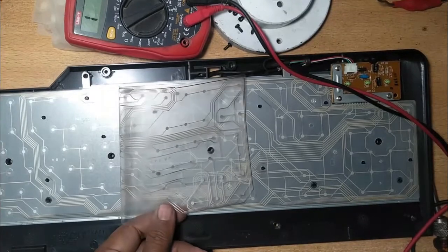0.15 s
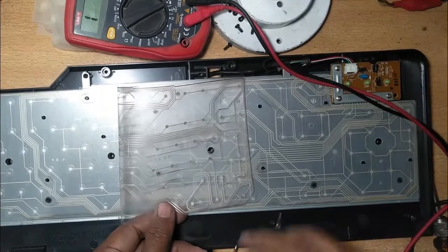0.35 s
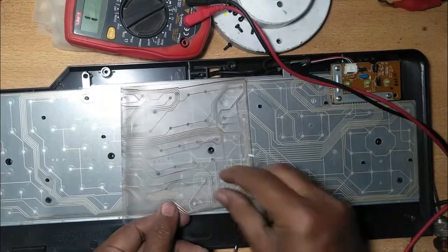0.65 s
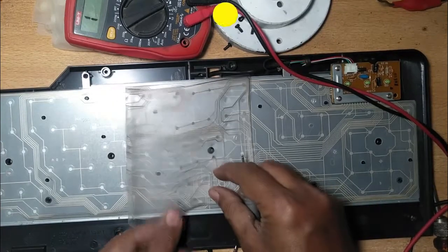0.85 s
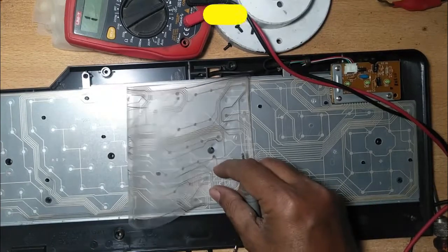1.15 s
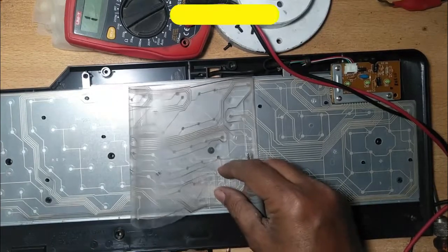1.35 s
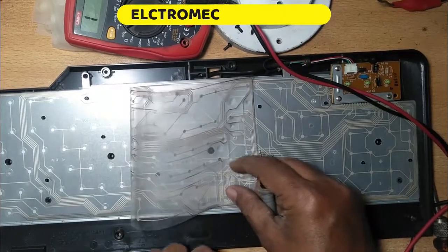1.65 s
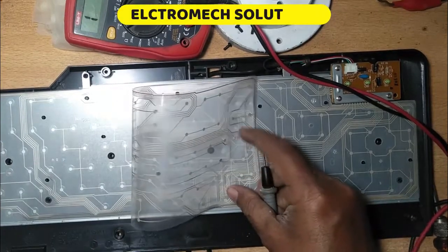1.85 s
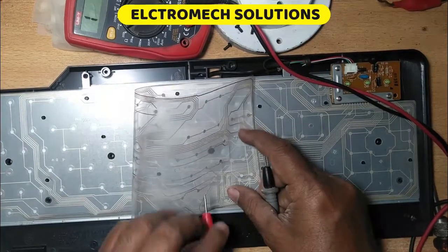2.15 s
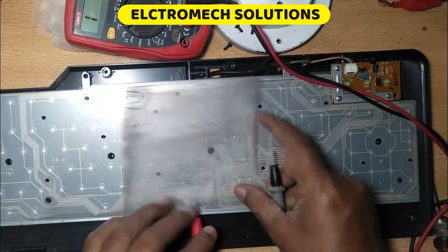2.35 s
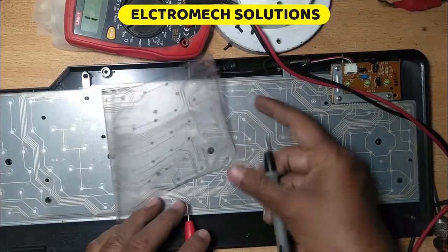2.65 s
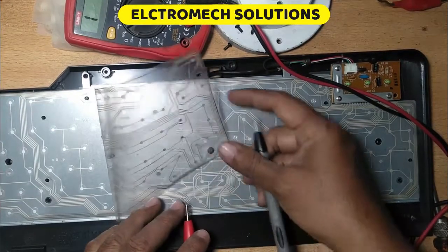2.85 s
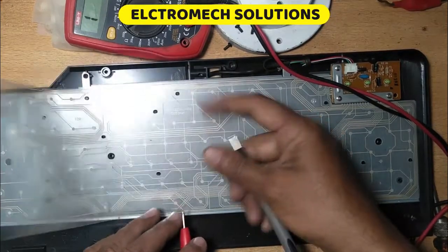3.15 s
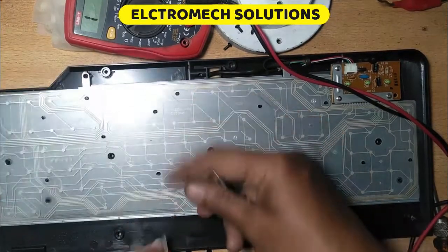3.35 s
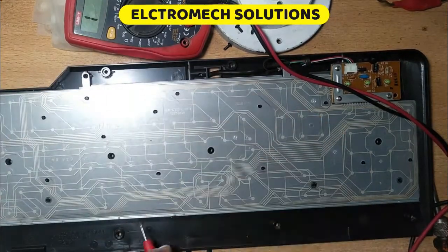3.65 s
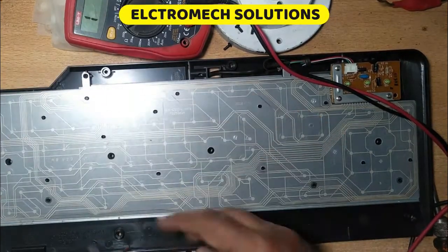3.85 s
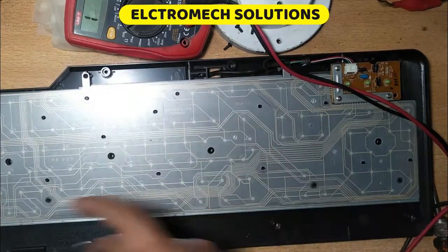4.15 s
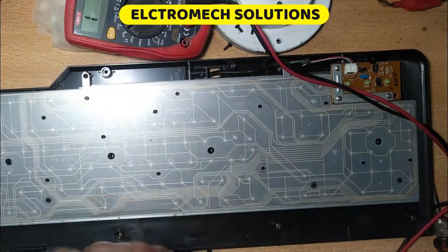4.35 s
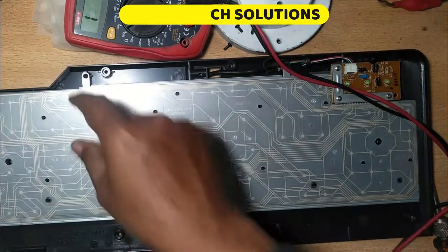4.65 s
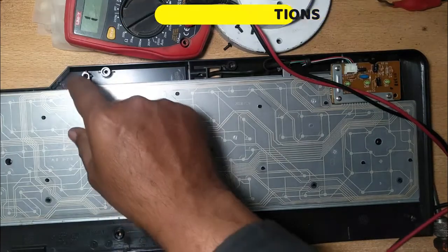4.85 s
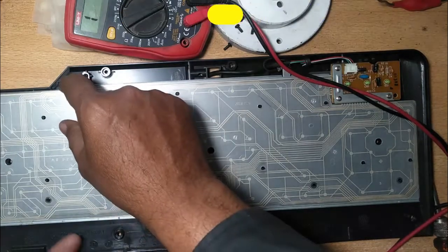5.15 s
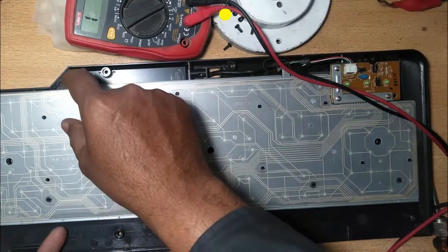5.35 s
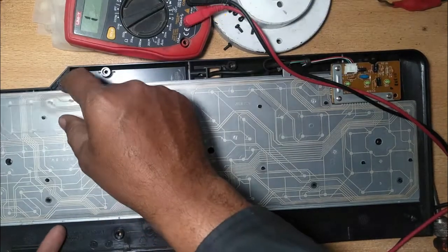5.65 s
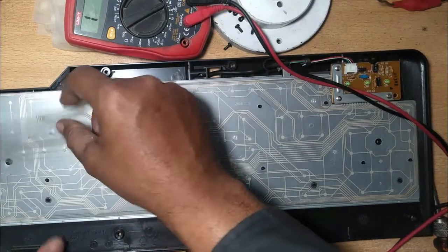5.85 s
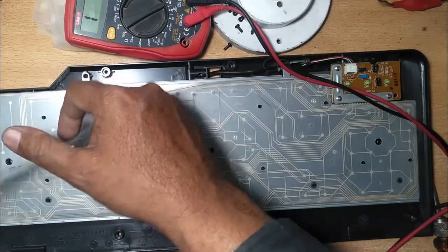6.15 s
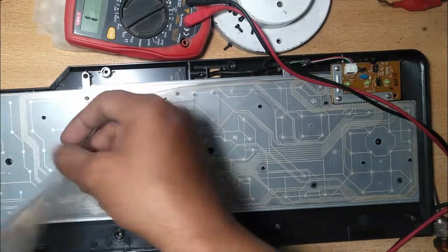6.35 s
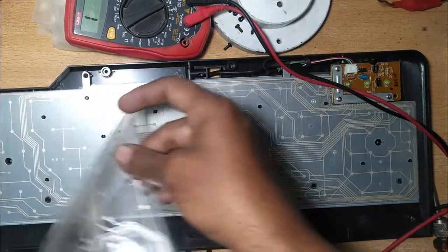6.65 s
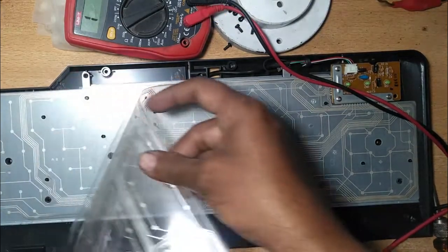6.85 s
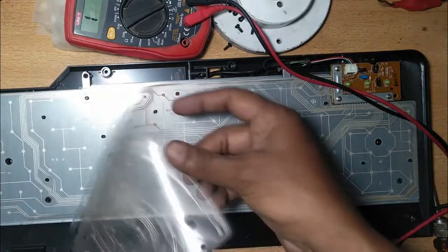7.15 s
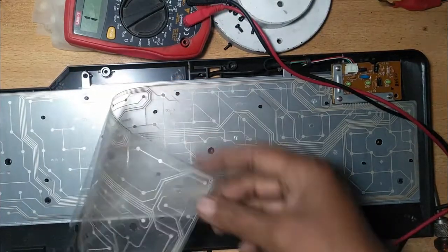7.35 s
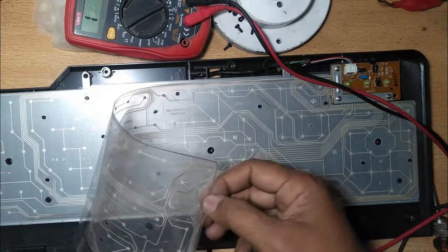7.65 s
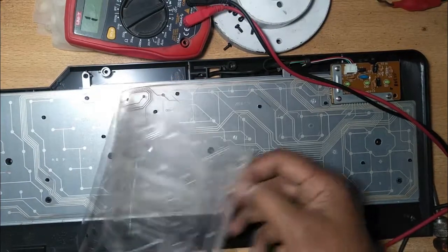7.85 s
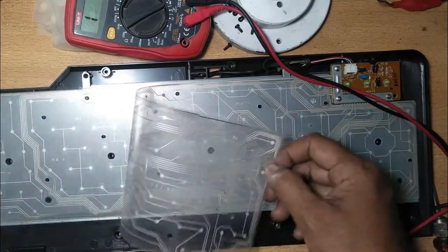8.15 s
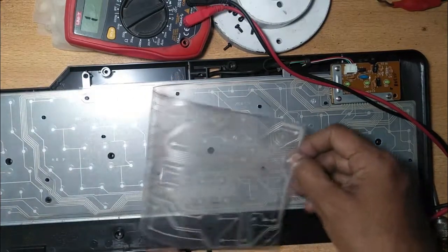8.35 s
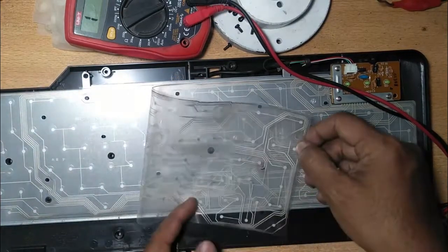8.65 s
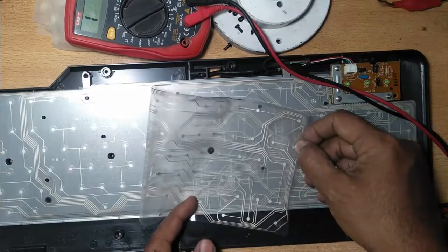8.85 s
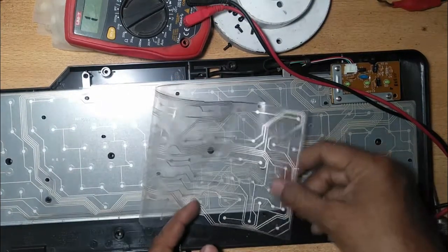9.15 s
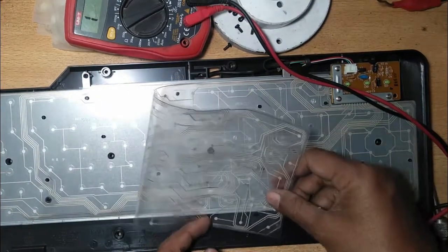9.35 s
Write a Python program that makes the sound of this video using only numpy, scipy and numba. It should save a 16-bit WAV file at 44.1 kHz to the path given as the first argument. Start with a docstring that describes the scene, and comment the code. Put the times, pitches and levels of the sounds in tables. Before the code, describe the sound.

A thin plastic sheet is lifted and flexed with irregular rustles and clicks, after a sharp double knock on a wooden bench.

```python
"""On a wooden bench in a small room, a thin plastic sheet is rubbed, lifted, flexed and laid on a tray.
Sliding, creaking, crunching and sharp buckling snaps make the sheet ring; when loose, it flaps and warbles.
Knocks ring the bench, and handling makes it rumble. A phone close by picks this up,
along with the room's short echo and a soft hiss."""
import sys
import numpy as np
from scipy import signal
from scipy.fft import rfft, irfft
from scipy.io import wavfile
from scipy.ndimage import uniform_filter1d
from numba import njit

SR = 44100
rng = np.random.default_rng(int(sys.argv[2]) if len(sys.argv) > 2 else 0)


def wrap_up_sound(samples):
    """Save the sound to the file named by the first command line argument, as 16-bit audio."""
    columns = np.atleast_2d(samples).T
    # keep every value between -1 and 1, then stretch to whole-number steps
    tamed = np.clip(columns, -1, 1)
    steps = np.round(tamed * 32767).astype(np.int16)
    wavfile.write(sys.argv[1], SR, steps)


N = 419391

# Table levels are relative. "Body" is the sheet's middle range; "centre" is the pitch that rings most.
# Slides of the sheet: t/s, rise/s, hold/s, treble level/dB, body level/dB, body centre f/Hz
SLIDES = [(0, 0.049, 0.13, -74.5, -72.5, 1680), (.27, 0.014, 0.098, -52, -51, 1600),
          (.45, 0.015, 0.17, -58, -61, 1740), (.75, 0.0032, 0.24, -59.5, -65.5, 1820),
          (1.15, 0.16, 0.051, -51, -55, 1660), (1.38, 0.085, 0.089, -50, -52.5, 2070),
          (1.62, 0.034, 0.14, -61.5, -53, 1600), (1.84, 0.048, 0.057, -64, -54, 1530),
          (2.22, 0.1, 0.15, -52.5, -59.5, 2440), (2.4, 0.055, 0.21, -55, -57, 1890),
          (2.66, 0.035, 0.28, -64, -58.5, 1690), (2.88, 0.041, 0.015, -51.5, -47.5, 1700),
          (3.25, 0.39, 0.047, -58, -72.5, 2370), (3.54, 0.035, 0.13, -97.5, -64, 1860),
          (4.01, 0.025, 0.23, -63, -59, 1950), (4.4, 0.22, 0.11, -63, -68.5, 2500),
          (4.53, 0.017, 0.059, -78.5, -58, 1840), (5.15, 0.007, 0.038, -67, -69.5, 2580),
          (5.345, .01, 0.021, -68.5, -69, 2700), (5.87, 0.11, 0.19, -57.5, -57.5, 2390),
          (6.3, 0.026, 0.13, -62, -67, 2240), (6.5, 0.066, 0.21, -52.5, -52.5, 1800),
          (6.69, 0.033, 0.059, -49, -47.5, 2270), (6.81, 0.04, 0.037, -49.5, -50, 1710),
          (6.92, 0.021, 0.096, -57, -55, 1710), (7.1, 0.038, 0.068, -48, -46.5, 1590),
          (7.25, 0.015, 0.19, -54, -63, 1710), (7.62, 0.049, 0.038, -68, -62, 1730),
          (7.82, 0.0067, 0.25, -67.5, -72.5, 1470), (8.3, 0.11, 0.1, -66, -71.5, 2590),
          (8.5, 0.01, 0.054, -54, -54, 2270), (8.62, 0.038, 0.088, -53.5, -57.5, 1680),
          (8.84, 0.14, 0.094, -54, -65.5, 1880), (9.08, 0.0056, 0.048, -46.5, -51, 1930),
          (9.17, 0.038, 0.14, -45, -50, 2140), (9.4, 0.011, 0.053, -53, -55, 2360)]
# Flapping of the loose end: t/s, rise/s, hold/s, level/dB, centre f/Hz
FLAPS = [(0, 0.13, 0.2, -65, 368), (.27, 0.014, 0.1, -42.5, 424), (1.25, 0.012, 0.35, -62.5, 554),
         (1.66, 0.013, 0.091, -46, 590), (2.62, 0.12, 0.56, -56, 376), (3.55, 0.027, 0.21, -67, 400),
         (4.02, 0.022, 0.19, -66, 653), (5.93, 0.05, 0.22, -62, 840), (6.34, 0.027, 0.046, -60, 840),
         (6.55, 0.027, 0.31, -55.5, 910), (6.75, 0.11, 0.41, -52.5, 577), (7.83, 0.018, 0.11, -64, 680),
         (8.52, 0.025, 0.014, -49, 880), (8.97, 0.011, 0.044, -57, 820)]
# Warbles of the loose sheet: t/s, length/s, f/Hz, level/dB
WARBLES = [(0, 0.41, 2003, -54), (0.754, 0.081, 637, -58), (0.812, 0.14, 194, -46.5),
           (1.02, 0.18, 853, -61.5), (1.087, 0.18, 1368, -59.5), (1.14, 0.47, 182.5, -51.5),
           (3.044, 0.42, 1954, -59.5), (3.22, 0.11, 191.3, -44), (3.1, .22, 1210, -64),
           (3.465, 0.14, 446.5, -43.5), (3.562, 0.093, 1690, -54.5), (3.66, 0.11, 399, -51),
           (3.869, 0.59, 1960, -59), (5.647, 0.071, 620, -59.5), (7.956, 0.022, 470, -46),
           (8.115, 0.089, 375, -52.5), (8.93, 0.033, 1040, -55.5)]
# Handling of the bench: t/s, rumble level/dB, thrum level/dB
HANDLING = [(.25, -70, -74), (.31, -55, -34), (.55, -65, -66.5), (1.1, -64, -66), (1.35, -59, -59),
            (2.2, -63.5, -78), (2.9, -62.5, -65.5), (4.3, -61, -68), (5.1, -64.5, -76), (5.8, -55, -62.5),
            (6.25, -61.5, -67.5), (6.8, -53, -57), (7.55, -65.5, -77.5), (7.68, -44, -48),
            (8.0, -56.5, -63), (8.6, -60, -68.5), (8.72, -50, -52.5), (9.0, -63.5, -76), (9.4, -55, -62)]
# Sharp snaps and soft crunches: t/s, treble level/dB, body level/dB, low level/dB, body centre f/Hz
SNAPS = [(0.2746, -10.5, -12, -17.5, 2500), (0.3494, -8, -13.5, -13, 2140), (0.384, -24, -30, -26.5, 1500),
         (1.676, -49.5, -25.5, -21, 1584), (2.372, -53, -31, -52, 1480), (2.968, -29, -30, -55, 2050),
         (3.6574, -56.5, -33.5, -41, 1275), (4.0181, -30, -24.5, -34, 2310), (4.19, -61, -34, -42.5, 1488),
         (5.348, -46.5, -37, -73, 2846), (5.4387, -74, -38.5, -50.5, 1990), (5.8794, -45.5, -41, -78, 2880),
         (5.9259, -51, -44.5, -73, 2470), (5.9957, -30, -29.5, -35.5, 2530),
         (6.0156, -29, -22.5, -30, 2830), (7.184, -46, -23, -27.5, 1510), (7.634, -56, -26.5, -40, 1435),
         (8.566, -35, -31.5, -33, 1330), (8.978, -21, -16.5, -33, 1840), (9.0946, -27.5, -26, -61, 1770)]
CRUNCHES = [(0.766, -39.5, -42.5, -47.5, 1790), (0.873, -42.5, -44, -71, 1570),
            (1.273, -47, -52, -39.5, 1330), (1.319, -31.5, -33, -29.5, 1300), (2.0795, -57, -46, -41, 1750),
            (2.338, -33.5, -39.5, -73, 3220), (2.4924, -33, -30.5, -75, 1950),
            (2.9886, -35.5, -32.5, -40, 1926), (4.857, -50.5, -42, -75, 1830),
            (5.1951, -42.5, -49.5, -75, 3000), (5.578, -62.5, -47.5, -52.5, 2590),
            (5.9564, -36, -36.5, -67, 3006), (6.135, -42, -42, -39, 1600), (6.363, -40.5, -34.5, -40, 1800),
            (6.782, -39, -35, -60, 1490), (7.042, -59, -33, -36.5, 1170), (7.1397, -32.5, -37, -55, 1460),
            (7.2164, -52.5, -25, -28, 1440), (7.423, -52, -40.5, -71, 2850), (7.685, -46, -37, -59, 1400),
            (7.841, -38.5, -28.5, -34, 1420), (7.9877, -36, -36.5, -69, 2410),
            (8.14, -64.5, -41, -41, 1226), (8.528, -32, -30, -55, 2370), (8.7004, -34, -30, -43, 1860),
            (9.241, -26, -36, -77, 1980), (9.356, -30.5, -35.5, -59, 2400)]
# Knocks on the bench: t/s, level/dB, centre f/Hz
KNOCKS = [(0.275, -9.5, 380), (0.351, -12.5, 277), (0.388, -24, 129), (1.275, -20, 184), (1.316, -22, 216),
          (1.399, -30.5, 222), (1.676, -17, 247), (4.02, -39, 330), (7.186, -29, 368), (8.567, -39.5, 373),
          (8.708, -29, 218)]
# Bright treble colour of the rustle and snaps, strongest near 6 kHz: f/Hz, width/Hz, level/dB
TREBLE_COLOUR = [(4265, 1300, -5.5), (5420, 1500, 2.5), (6124, 700, 4.5), (6810, 840, 0),
                 (7620, 2200, -7.5)]
# Their airy top, above the treble: f/Hz, width/Hz, level/dB
TOP_COLOUR = [(9400, 5700, -0.5), (11800, 4500, -4.5), (14300, 4000, -17)]
# The sheet's middle and low resonances (pitches it rings at): f/Hz, width/Hz, level/dB
SHEET_BODY = [(1259, 65, -0.5), (1474, 223, 3), (1750, 228, -0.5), (1989, 220, 2), (2345, 236, 0.5),
              (2840, 330, 3), (3200, 150, 2), (3530, 800, 1)]
SHEET_LOW = [(318.3, 85, 2.5), (382.5, 60, 3), (465, 96, 1.5), (600, 230, -5), (840, 117, -0.5),
             (1014, 556, 0.5)]
# Deep resonances of the handled bench: f/Hz, width/Hz, level/dB
BENCH_THRUM = [(95.1, 37, -2), (142.2, 50, -1)]
BENCH_RUMBLE = [(40.6, 20, -3)]
# Tones of the knocked bench: f/Hz, level/dB, fade time/s
BENCH_TONES = [(102, 3.5, .2), (140.4, -5, 0.23), (215, 1.5, 0.18), (243, -0.5, 0.18), (335, -6.5, 0.19),
               (376, -4.5, 0.16), (640.5, 3.5, 0.076), (762, -3.5, 0.14), (1076, -9, 0.21)]
# Tone colour of the background hiss: f/Hz, level/dB
HISS_COLOUR = [(47, -50.5), (80, -6), (174, -12), (431, -16.5), (1310, -23.5), (2130, -29), (12300, -32),
               (16000, -31)]


def gain(db):
    """Turn decibels into a factor to multiply by."""
    return 10 ** (np.asarray(db) / 20)


def at_level(x, db):
    """Scale a sound to an average (rms) level."""
    return x * gain(db) / np.sqrt(np.mean(x ** 2))


def fade(t, fade_s):
    """A ring dying away, by 60 dB every fade_s seconds."""
    return np.exp(-np.log(1000) * t / fade_s)


def wander(per_s, size=N):
    """A smooth random curve, roughly between -1 and 1, that picks per_s new values a second."""
    hold = int(SR / per_s)
    steps = np.repeat(rng.standard_normal(size // hold + 1), hold)
    return 1.48 * uniform_filter1d(uniform_filter1d(steps, hold), hold)[:size]


def grit(scatter_db):
    """Countless tiny slips of uneven size make a gritty noise."""
    noise = rng.standard_normal(N)
    sizes = np.minimum(rng.exponential(size=N), 6)
    return at_level(noise * gain(scatter_db * sizes), 0)


@njit
def band_pass(x, hz, width_hz, bend):
    """Let through the sound near one pitch, which bend shifts from moment to moment."""
    out, band_state, low_state = np.empty(len(x)), 0., 0.
    tuning, damping = np.tan(np.pi * hz / SR), width_hz / hz
    for i in range(len(x)):
        step = tuning * bend[i]
        band = (band_state + step * (x[i] - low_state)) / (1 + step * (step + damping))
        band_state = 2 * band - band_state
        low_state += 2 * step * band
        out[i] = damping * band
    return out


def ring(shake, bands, waver_db, per_s, centre_hz=None, db_per_octave=0):
    """Pass a shaking through pitch bands that drift, come and go; those far from the centre ring less."""
    bend = 1 + .018 * wander(8)
    signs = np.sign(rng.standard_normal(N))
    out, power = 0, 0
    for k, (hz, width, db) in enumerate(bands):
        if centre_hz is not None:
            db = db - db_per_octave * np.abs(np.log2(centre_hz / hz))
        shift = k * N // len(bands)  # each gets its own drift and its own push directions
        band = shake * np.roll(signs, shift)
        for widen in (2., 1., 1.):  # three passes give steep sides
            band = band_pass(band, float(hz), widen * width, np.roll(bend, shift))
        out += gain(db) * gain(waver_db * wander(per_s)) * band
        power += gain(db) ** 2 * np.pi / 2 * width / SR
    return out / np.sqrt(power)


def strokes(table, fall_db_per_s):
    """Movements that rise, hold and fall away: their levels in dB, then their centre pitch."""
    t = np.arange(N) / SR
    power, centre_hz = 1e-12, np.full(N, float(table[0][-1]))
    for start, rise, hold, *db, hz in table:
        rising_db = -19.5 * (1 - (t - start) / rise)
        falling_db = -fall_db_per_s * np.maximum(t - start - rise - hold, 0)
        shape_db = np.where(t < start + rise, rising_db, falling_db)
        power = power + np.outer(gain(db), gain(np.maximum(shape_db, -200))) ** 2
        centre_hz[t >= start] = hz
    return *(10 * np.log10(power)), centre_hz


def sliding(slips, treble_db, body_db, body_hz):
    """Tiny slips shake the sliding sheet into a rustle."""
    top_db = 1.287 * treble_db + 4.5  # a harder rub is brighter
    treble = ring(slips * gain(treble_db), TREBLE_COLOUR, waver_db=3, per_s=30)
    top = ring(slips * gain(top_db), TOP_COLOUR, waver_db=3, per_s=25)
    body = ring(slips * gain(body_db), SHEET_BODY, 4, 12, body_hz, db_per_octave=10.5)
    return treble + top + body


def flapping(slips):
    """The loose end flaps and shakes the sheet's low resonances."""
    db, centre_hz = strokes(FLAPS, fall_db_per_s=164.5)
    return ring(slips * gain(db), SHEET_LOW, 2.2, 22, centre_hz, db_per_octave=14)


def creaks(body_db, body_hz, per_s=120, low_hz=800, high_hz=3600):
    """Patches of the bent sheet give way at random: brief rough tones, loudest near the slide's pitch."""
    out, roughness = np.zeros(N + SR), wander(130)
    for when, pitch, size, length in rng.random((int(per_s * N / SR), 4)):
        i = int(when * N)
        hz = low_hz * (high_hz / low_hz) ** pitch
        t = np.arange(int(.1 * (.5 + length) * SR)) / SR
        swell = np.sin(np.pi * np.sqrt(t / t[-1])) ** 2
        db = body_db[i] - 9 + 7 * size - 8.2 * abs(np.log2(hz / body_hz[i]))
        out[i:i + len(t)] += gain(db) * swell * np.sin(2 * np.pi * hz * t)
    return out[:N] * roughness


def warbles():
    """The loose sheet sings soft, wobbly tones; the higher they are, the more they blur into a rub."""
    out = np.zeros(N)
    for start, length, hz, db in WARBLES:
        i, n = int(start * SR), int(length * SR)
        progress = np.linspace(0, 1, n)
        flutter, drift = (wander(20 + hz / 11, n) for _ in range(2))
        tone = gain(1.6 * flutter) * np.sin(2 * np.pi * hz * length * progress + .79 * drift)
        rub = at_level(band_pass(rng.standard_normal(n), float(hz), hz / 24, np.ones(n)), -2)
        blur = min(hz / 2600, 1)
        swell = np.sin(np.pi * progress ** .53)
        out[i:i + n] += gain(db) * swell * ((1 - blur) * tone + blur * rub)
    return out


def handling():
    """Handling keeps the bench thrumming, with a deeper rumble below."""
    times, *levels = np.transpose(HANDLING)
    rumble, thrum = (gain(np.interp(np.arange(N) / SR, times, db)) for db in levels)
    return (ring(rng.standard_normal(N) * thrum, BENCH_THRUM, waver_db=3, per_s=9.8)
            + ring(rng.standard_normal(N) * rumble, BENCH_RUMBLE, waver_db=3, per_s=15))


def hiss():
    """The room and microphone hiss softly, wavering a little."""
    hz, db = np.transpose(HISS_COLOUR)
    all_hz = np.arange(N // 2 + 1) * SR / N + 1
    colour = gain(np.interp(np.log(all_hz), np.log(hz), db))
    noise = irfft(rfft(rng.standard_normal(N)) * colour, N)
    return at_level(noise, -68.5) * gain(.5 * wander(5.1))


def buckling(table, rise_s, fade_s, ragged_db, top_db, gain_db):
    """The sheet buckles and bursts of grit shake it: quick ones snap, slower ones crunch."""
    bursts, centre_hz = np.zeros((3, N)), np.full(N, float(table[0][-1]))
    t = np.arange(int(.2 * SR)) / SR
    shape = np.minimum(t / rise_s, 1) ** 2 * fade(np.maximum(t - rise_s, 0), fade_s)
    for when, *levels_db, hz in table:
        i = int((when - .71 * rise_s) * SR)
        bursts[:, i:i + len(t)] += np.outer(gain(levels_db), shape)[:, :N - i]
        centre_hz[i:] = hz
    treble, body, low = (burst * grit(1) * gain(gain_db + ragged_db * wander(400)) for burst in bursts)
    damped_body = [(hz, 1.6 * width, db) for hz, width, db in SHEET_BODY]  # wider means a shorter ring
    return (ring(treble, TREBLE_COLOUR, waver_db=2.5, per_s=15)
            + ring(treble * gain(top_db), TOP_COLOUR, waver_db=-1.5, per_s=23)
            + ring(body, damped_body, 3.6, 10, centre_hz, db_per_octave=18.5)
            + ring(low, SHEET_LOW, waver_db=3.5, per_s=15))


def knocks():
    """Each knock rings the bench's tones in its own mix."""
    out = np.zeros(N)
    hz, tone_db, fade_s = np.transpose(BENCH_TONES)[:, :, None]
    t = np.arange(int(.4 * SR)) / SR
    tones = np.sin(2 * np.pi * hz * t) * fade(t, fade_s) * np.minimum(t / .0032, 1)
    for start, db, centre_hz in KNOCKS:
        i = int(start * SR)
        push = rng.standard_normal(hz.shape)
        mix_db = tone_db + .62 * push - 4.7 * np.abs(np.log2(hz / centre_hz))
        out[i:i + len(t)] += gain(db - 16) * (np.sign(push) * gain(mix_db) * tones).sum(axis=0)
    return out


def room_echo(sound, fade_s=.28, echo_db=-12.5):
    """The walls of the small room add a short tail to the sound."""
    t = np.arange(int(.5 * SR)) / SR
    tail = rng.standard_normal(len(t)) * fade(t, fade_s) * np.minimum(t / .0025, 1)
    tail *= gain(echo_db) / np.sqrt(np.sum(tail ** 2))
    return signal.fftconvolve(sound, tail)[:N]


def scene():
    """Add the sheet, the bench, their echo and the hiss into one channel."""
    treble_db, body_db, body_hz = strokes(SLIDES, fall_db_per_s=153.5)
    body_db = np.maximum(body_db, -85.5)  # the sheet keeps settling between slides
    slips = grit(scatter_db=3) * gain(1.7 * wander(90))  # it moves in small fits and starts
    rustle = sliding(slips, treble_db, body_db, body_hz) + flapping(slips) + creaks(body_db, body_hz)
    snaps = buckling(SNAPS, rise_s=.0014, fade_s=.032, ragged_db=1.83, top_db=-9.5, gain_db=-8)
    crunches = buckling(CRUNCHES, rise_s=.013, fade_s=.081, ragged_db=1, top_db=-18.5, gain_db=-10)
    near = rustle + snaps + crunches + warbles() + handling() + knocks()
    return (near + room_echo(near) + hiss())[None]


def record(dry):
    """The phone cuts off sound above 16000 Hz."""
    return signal.sosfilt(signal.ellip(10, .2, 60, 16000, fs=SR, output="sos"), dry)


dry = scene()
out = record(dry)
wrap_up_sound(out)
```